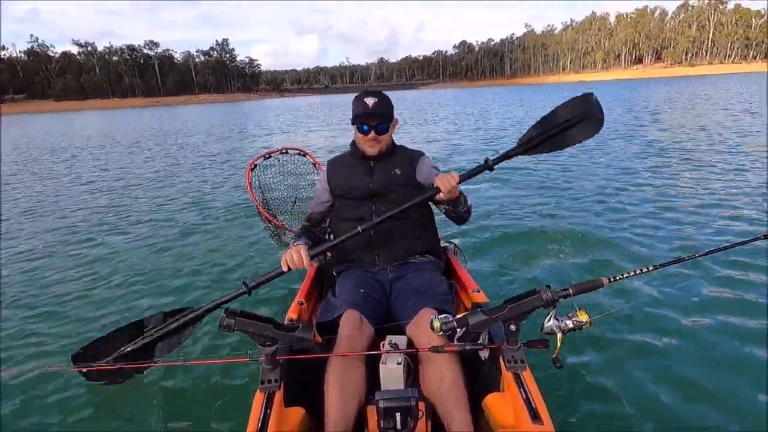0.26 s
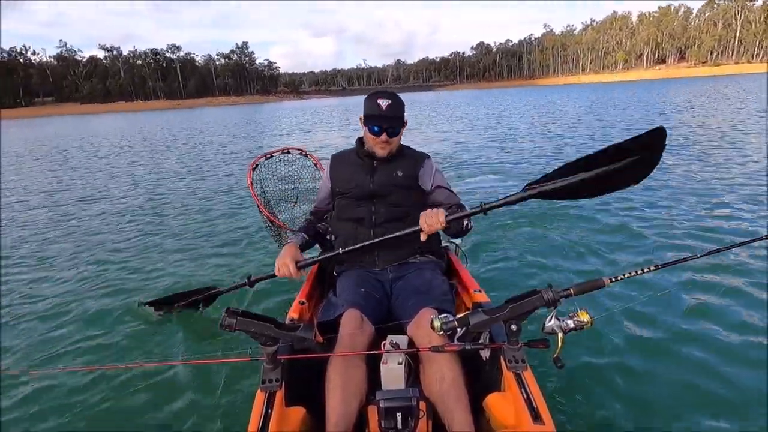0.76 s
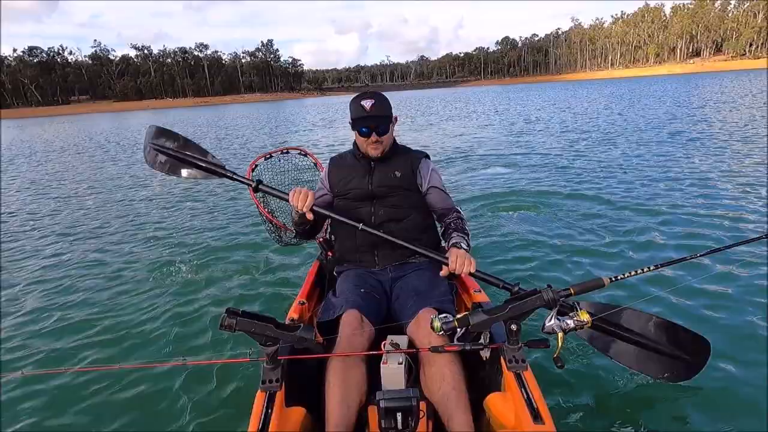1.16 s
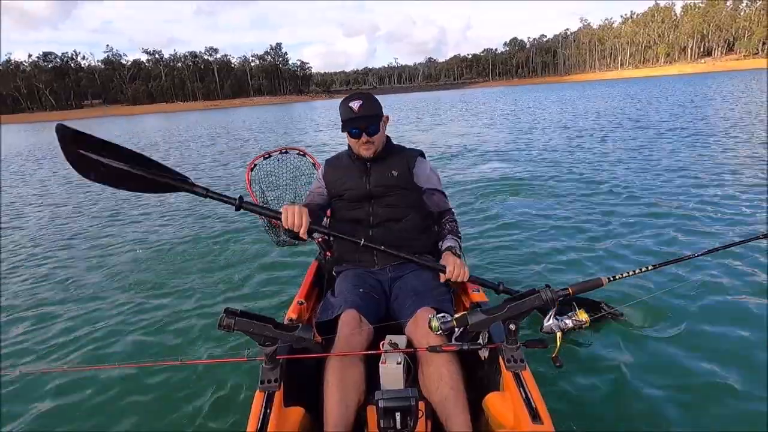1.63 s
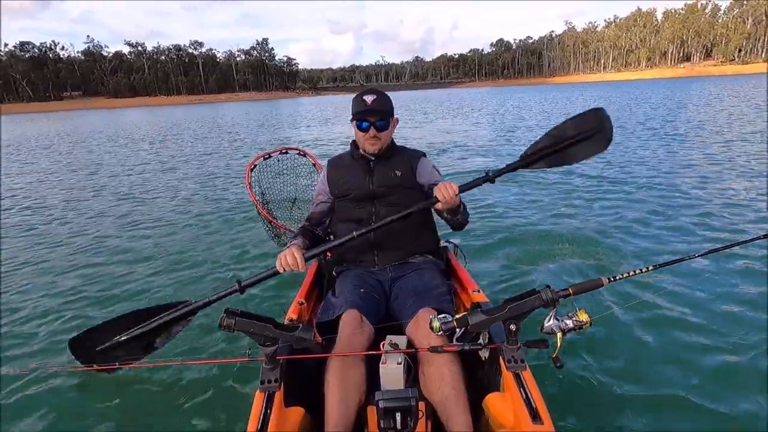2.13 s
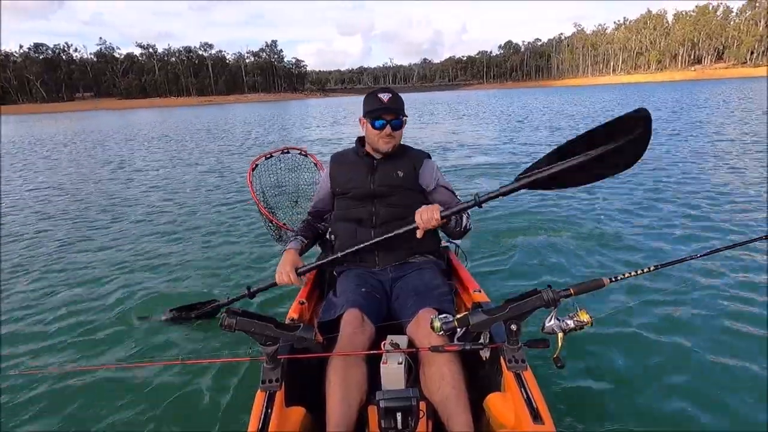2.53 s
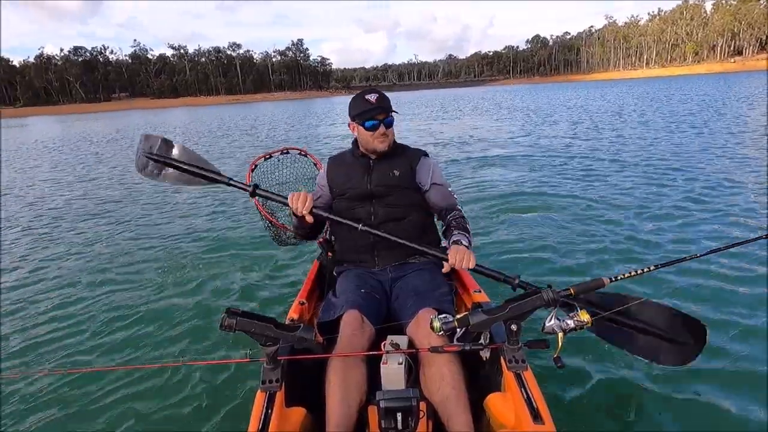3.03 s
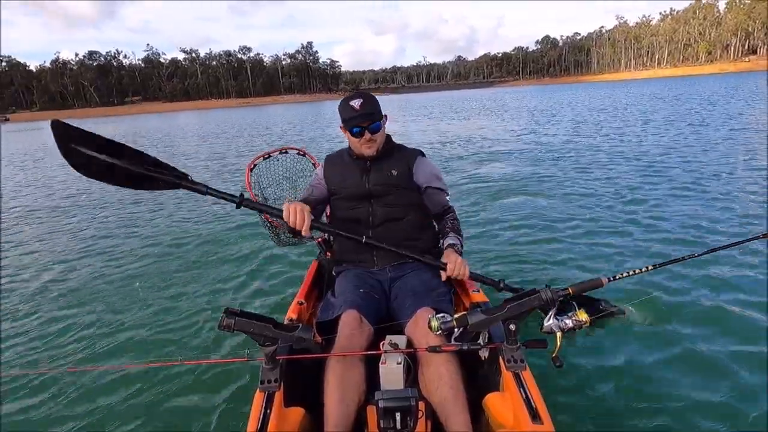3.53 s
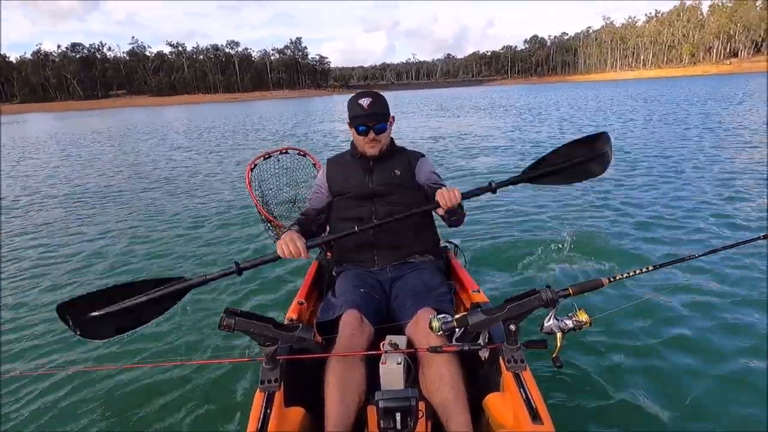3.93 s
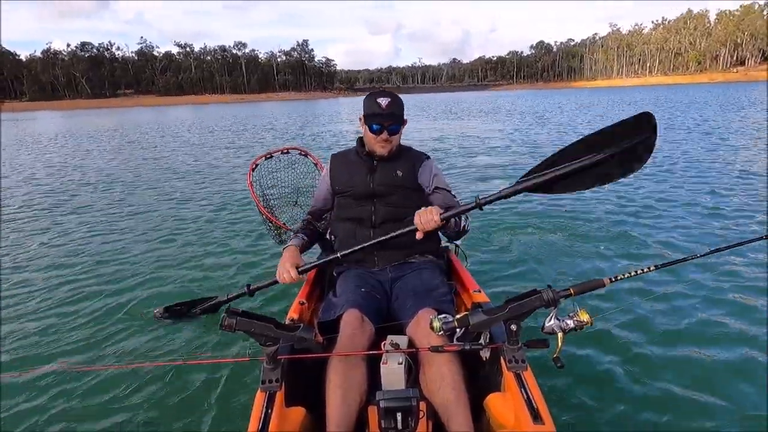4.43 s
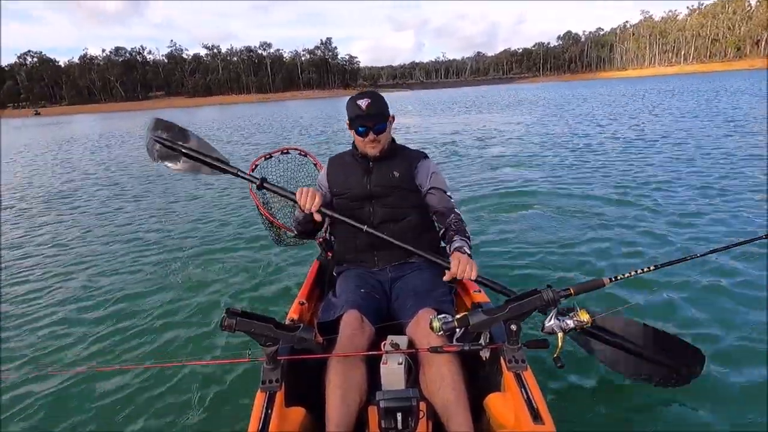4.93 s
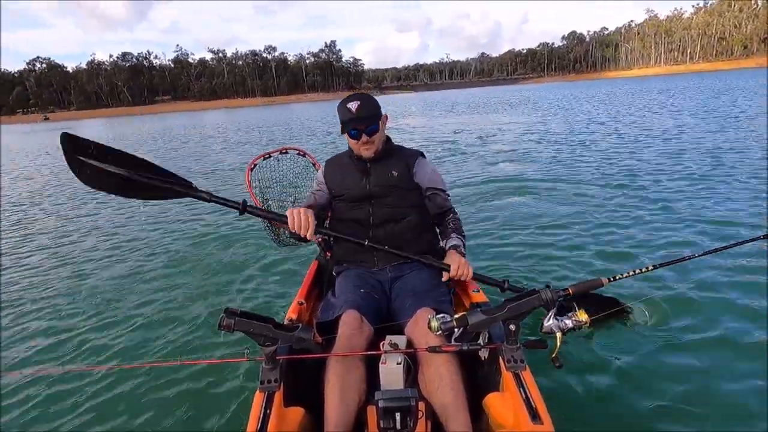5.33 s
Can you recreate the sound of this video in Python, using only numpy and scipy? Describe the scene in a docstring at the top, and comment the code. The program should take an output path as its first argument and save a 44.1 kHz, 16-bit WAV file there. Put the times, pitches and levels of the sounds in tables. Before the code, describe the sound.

Close on a small plastic boat outdoors, paddle blades dip one side then the other, giving gurgles, glugs, short splashes and crisp drops. Low gusty wind rumbles against the exposed microphone, heaviest during the first half. Later the wind thins, a fuller splash washes past near four seconds, and soft hollow hull taps join in. The sound is mono and dry, with no open-water reverberation.

```python
"""A paddle churns lake water beside a small plastic boat: band-shaped noise and swarms of tiny ringing
bubbles make fizz, slosh, glugs and spray that leap up as sheets of water break off the blade.
Single air pockets ring as gliding sines with a faint deck echo, and drops crack and ring on water or deck.
Noise pushes ring the hollow hull as wavelets slap it. Shaped noise makes the gusting wind's rumble,
buffeting and roar at the microphone, and a steady wash of ripples all around."""
import sys
import numpy as np
from scipy import signal
from scipy.io import wavfile
from scipy.ndimage import uniform_filter1d

SR = 44100
rng = np.random.default_rng(int(sys.argv[2]) if len(sys.argv) > 2 else 0)


def convert_level_to_amplitude(level_db):
    """Map a level in decibels to its linear amplitude factor."""
    exponent = np.asarray(level_db, float) / 20
    return 10 ** exponent


def master(y):
    """Save y as 16-bit WAV."""
    cut = np.clip(np.atleast_2d(y).T, -1, 1)
    pcm = np.round(cut * 32767)  # scale
    wavfile.write(sys.argv[1], SR, pcm.astype(np.int16))


N = 245635  # length [samples]


def evened(x):
    """Scales to rms 1."""
    return x / np.sqrt(np.mean(x ** 2) + 1e-20)


def read(points, hz):
    """Reads a spectrum table on a log-frequency axis."""
    f, value = np.transpose(points)
    return np.interp(np.log(hz + 1), np.log(f + 1), value)


def curves(rows):
    """The columns of a time table, one value a sample."""
    s, *columns = np.transpose(rows)
    t = np.arange(N) / SR
    return [np.interp(t, s, column) for column in columns]


def add(mix, s, sound):
    """Mixes a sound in at time s."""
    part = mix[round(s * SR):][:len(sound)]
    part += sound[:len(part)]


def flicker(s):
    """Smooth random curve of rms 1 that changes within about s seconds."""
    width = round(s * SR)
    smooth = uniform_filter1d(rng.standard_normal(N), width)
    return evened(uniform_filter1d(smooth, width))


def noise(spectrum, size, patchy_db, shared_db):
    """Random short-time spectra with drifting patches, under a level flicker shared by all bins."""
    frames = 4 * N // size + 5
    hz = np.fft.rfftfreq(size, 1 / SR)
    real, imaginary, patches = rng.standard_normal((frames, len(hz), 3)).T
    patches = uniform_filter1d(patches, size=5, axis=0)  # across frequency
    patches = evened(uniform_filter1d(patches, size=8, axis=1))  # across time
    bin_db = read(spectrum, hz)[:, None] + patchy_db * 2 * np.tanh(patches / 2)  # limits the extremes
    bins = (real + 1j * imaginary) * convert_level_to_amplitude(bin_db)
    sound = signal.istft(bins, nperseg=size, noverlap=3 * size // 4)[1][:N]
    return evened(convert_level_to_amplitude(shared_db) * sound)


def bubble(hz, t60, swell=0.00088, climb=0.5):
    """A ringing air pocket: a dying sine whose pitch glides by climb octaves, upward near the surface."""
    t = np.arange(0, max(t60, .003), 1 / SR)
    shape = convert_level_to_amplitude(-60 * t / t[-1]) * (1 - np.exp(-(t / swell) ** 2))
    pitch_hz = hz * 2 ** (climb * t / t[-1])
    return shape / shape.max() * np.sin(2 * np.pi * np.cumsum(pitch_hz) / SR)


def swarm(spectrum, low_hz, high_hz, per_s, cycles, spread_db, count=50):
    """Many small bubbles of mixed size bursting at random; a few are loud if spread_db is above zero."""
    loudness = convert_level_to_amplitude(spread_db * np.minimum(rng.exponential(1, N), 3.2))
    bursts = loudness * (rng.random(N) < per_s / SR)
    kind = rng.integers(0, count, N)
    out = np.zeros(N)
    for k, hz in enumerate(np.geomspace(low_hz, high_hz, count)):
        t60 = rng.uniform(0.16, 1.3) * cycles / hz
        grain = bubble(hz, t60, swell=2.2 / hz, climb=rng.uniform(-0.38, 0.52))
        out += convert_level_to_amplitude(read(spectrum, hz)) * hz * signal.oaconvolve(bursts * (kind == k), grain)[:N]
    return evened(out)


def lake_ripples():
    """Steady wash of ripples all around: patchy noise with a fixed spectrum."""
    # wash spectrum: (frequency [Hz], relative density [dB per Hz])
    ripple_spectrum = [(900, -47), (1600, -4.5), (3300, -21), (5500, -15), (7500, -15.5), (10000, -23.5),
                       (13500, -94)]
    return convert_level_to_amplitude(-70.5) * noise(ripple_spectrum, size=512, patchy_db=5, shared_db=0)


def wind():
    """Turbulence at the microphone port: smooth rumble, lumpier buffeting and a roar above it."""
    # gusts: (time [s], gust level [dB], upper-bass buffeting above the gust [dB])
    gusts = [(0, -28, -2), (.08, -35, -7), (.25, -22, -14.5), (.3, -27, -7.5), (.51, -20.5, -9),
             (1.66, -20, -4.5), (1.8, -19, -13.5), (2.22, -22.5, -12.5), (2.33, -19, -13.5),
             (2.48, -19.5, -5.5), (2.57, -22, -19), (2.6, -18.5, -5.5), (3.25, -23.5, -12.5),
             (3.43, -24.5, -20), (3.8, -24.5, -17), (3.89, -23, -16), (3.96, -34, -38), (4.08, -26, -21),
             (4.42, -35, -12), (4.55, -35, -12), (4.67, -28, -22), (4.75, -40, -5.5), (5.035, -26, -8.5),
             (5.065, -22.5, -13), (5.3, -26.5, -2.5), (5.57, -25, -20)]
    # spectra of the three layers: (frequency [Hz], relative density [dB per Hz])
    rumble_spectrum = [(15, 2), (40, 4), (100, 3), (160, -5), (260, -17), (500, -52.5), (1500, -110)]
    buffet_spectrum = [(100, -1), (190, 0.5), (300, -4), (450, -16.5), (900, -58), (2500, -110)]
    roar_spectrum = [(200, -1), (360, 3), (550, 1), (800, -5), (1500, -31), (5000, -92)]
    gust_db, above_db = curves(gusts)
    buffet_db = gust_db + above_db
    roar_db = -11 + 0.95 * buffet_db  # dB of roar per dB of buffeting
    lumps = flicker(0.0059)
    rumble = noise(rumble_spectrum, size=2048, patchy_db=0.0, shared_db=0.27 * flicker(0.31))
    buffet = noise(buffet_spectrum, size=1024, patchy_db=1.0, shared_db=3.1 * lumps)
    roar = noise(roar_spectrum, size=512, patchy_db=1.0, shared_db=5.3 * lumps)
    return convert_level_to_amplitude(gust_db) * rumble + convert_level_to_amplitude(buffet_db) * buffet + convert_level_to_amplitude(roar_db) * roar


def slap(push_s=0.0036):
    """A short uneven push of water rings the hull's modes."""
    # hull modes: (frequency [Hz], relative level [dB], time to die by 60 dB [s])
    hull_modes = [(379, -13, 0.15), (402, -7.5, 0.16), (506, 6.5, 0.058), (620, 4.5, 0.0046),
                  (900, 6, 0.0069)]
    t = np.arange(0, .2, 1 / SR)
    push = rng.standard_normal(len(t)) * np.exp(-t / push_s)
    ring = sum(convert_level_to_amplitude(db - 60 * t / t60) * np.sin(2 * np.pi * hz * t) for hz, db, t60 in hull_modes)
    sound = signal.fftconvolve(push, ring)[:len(t)]
    return sound / abs(sound).max()


def hull_slaps():
    """Wavelets slap the hull, each with a fresh random push."""
    # slaps: (time [s], peak level [dB])
    slap_times = [(3.107, -19), (3.46, -21.5), (4.091, -18), (4.455, -26.5), (5.195, -28), (5.278, -33)]
    out = np.zeros(N)
    for s, db in slap_times:
        add(out, s, convert_level_to_amplitude(db) * slap())
    return out


def drop(hz, crack_db, crack_s=0.0014):
    """A wide wet crack at impact while a tiny cavity rings."""
    t = np.arange(round(.03 * SR)) / SR
    burst = rng.standard_normal(len(t)) * np.exp(-t / crack_s) * np.minimum(t / 0.0008, 1)
    body_band = signal.butter(5, [550, 5250], "bandpass", fs=SR, output="sos")
    tick_band = signal.butter(5, [6200, 8970], "bandpass", fs=SR, output="sos")
    sound = signal.sosfilt(body_band, burst) + convert_level_to_amplitude(-18) * signal.sosfilt(tick_band, burst)
    sound *= convert_level_to_amplitude(crack_db) / abs(sound).max()
    t60 = min(25.4 / hz, t[-1])  # the cavity dies by 60 dB in 25.4 cycles
    add(sound, 0, bubble(hz, t60, swell=0.0007, climb=0.1))
    return sound


def blade_drops():
    """Drops off the blade strike water or deck, each with its own ring and crack."""
    # drops: (time [s], ring level [dB], ring pitch [Hz], crack above the ring [dB])
    drop_hits = [(0.1953, -29, 2670, -2), (0.441, -26.5, 2090, -14), (0.6567, -23, 4220, -16),
                 (0.681, -24, 2080, -14), (0.852, -42, 5600, -15.5), (1.455, -30, 2460, 4.5),
                 (1.6287, -21, 1930, -4.5), (1.8458, -23, 3100, -29), (1.872, -23.5, 2850, -22),
                 (1.938, -21.5, 4180, -34), (1.967, -18, 2100, -20), (2.1833, -18.5, 2930, -21),
                 (2.362, -25.5, 2470, 10.5), (2.451, -32, 2800, -15), (2.558, -32, 7100, -10),
                 (2.561, -23.5, 2740, 0), (2.631, -29.5, 3080, -2), (2.668, -36, 5550, -2),
                 (2.774, -29.5, 2830, 5), (2.827, -31.5, 2610, -3), (3.068, -30, 2840, -2),
                 (3.3, -29, 4700, 1.5), (3.5842, -18, 2910, -7.5), (3.847, -26, 3900, -21),
                 (3.886, -24.5, 3500, -17), (3.917, -27, 3280, -29), (3.932, -24.5, 3740, -7),
                 (4.091, -37, 2660, 8.5), (4.489, -35, 5350, -20), (4.708, -58, 2650, 22),
                 (5.0146, -37, 1980, 11.5), (5.3647, -30, 2650, 1)]
    out = np.zeros(N)
    for s, db, *character in drop_hits:
        add(out, s, convert_level_to_amplitude(db) * drop(*character))
    return out


def air_pockets():
    """Large bubbles and slower-swelling pockets ring one by one; the deck throws each back."""
    # large bubbles: (time [s], peak level [dB], pitch [Hz], time to die by 60 dB, at least 0.003 [s])
    large_bubbles = [(0.214, -23, 978, 0.055), (0.268, -29, 953, 0.038), (0.347, -29.5, 960, 0.11),
                     (0.451, -28.5, 1005, 0.073), (0.604, -29, 1135, 0.069), (0.751, -25, 1320, 0.012),
                     (0.89, -21.5, 1570, 0.0092), (0.948, -17, 1060, 0.032), (0.959, -19.5, 1242, 0.046),
                     (1.037, -27, 950, 0.058), (1.096, -26.5, 1390, 0.025), (1.165, -22, 754, 0.06),
                     (1.192, -27.5, 1470, 0.02), (1.23, -28, 935, 0.057), (1.247, -26, 1830, 0.033),
                     (1.414, -28, 1014, 0.034), (1.617, -17, 1090, 0.0046), (1.896, -25.5, 1380, 0.026),
                     (1.985, -24, 620, 0.066), (2.571, -20.5, 1140, 0.046), (2.64, -31.5, 1645, 0.045),
                     (2.833, -12, 830, 0.0023), (3.004, -24.5, 1240, 0.012), (3.074, -19.5, 970, 0.026),
                     (3.131, -22, 1050, 0.021), (3.214, -23, 750, 0.026), (3.264, -19.5, 855, 0.023),
                     (3.41, -37, 1360, 0.042), (3.586, -20, 1240, 0.015), (3.639, -17.5, 1380, 0.0074),
                     (3.949, -24, 1146, 0.033), (4.109, -24, 1060, 0.031), (4.504, -30, 1000, 0.046),
                     (4.712, -20, 1170, 0.015), (4.882, -22.5, 460, 0.028), (4.923, -21.5, 783, 0.022),
                     (5.237, -22.5, 1196, 0.0066), (5.279, -28, 1060, 0.024), (5.35, -24, 462, 0.087),
                     (5.544, -26.5, 1173, 0.06)]
    # gliding pockets: the same columns, then (swell time [s], pitch climb [octaves])
    risers = [(0.361, -34, 930, 0.054, 0.013, 1.44), (0.975, -19.5, 750, 0.07, 0.0012, 2.8),
              (1.0, -28, 900, 0.073, 0.0033, 2), (2.315, -20.5, 150.2, 0.12, 0.019, 5),
              (3.468, -26, 467, 0.099, 0.0081, -1.3), (3.585, -28.5, 753, 0.16, 0.012, 4.65),
              (3.639, -28, 900, 0.064, 0.0033, 3), (4.684, -37, 1180, 0.022, 0.019, 0),
              (4.748, -23, 1103, 0.014, 0.009, -0.1), (4.753, -21, 605, 0.025, 0.007, 0.9),
              (4.845, -31.5, 900, 0.1, 0.025, -1.3), (5.455, -34, 671, 0.077, 0.013, 1.3),
              (5.051, -28, 288.4, 0.23, 0.0056, 1.9), (5.095, -25.5, 280, 0.052, 0.0097, -0.6),
              (5.062, -20, 189, 0.12, 0.0048, 0.5), (5.148, -22, 235, 0.094, 0.011, 0.5)]
    # deck echo: (delay [s], level [dB])
    deck_echoes = [(.0057, -18)]
    bubbles = np.zeros(N)
    for s, db, *shape in (*large_bubbles, *risers):
        add(bubbles, s, convert_level_to_amplitude(db) * bubble(*shape))
    out = bubbles.copy()
    for delay, db in deck_echoes:
        add(out, delay, convert_level_to_amplitude(db) * bubbles)
    return out


def churn():
    """Water torn by the blade: low slosh and glugs, fizz and small bubbles, with finer flickering spray."""
    # churn: (time [s], level [dB])
    churn_levels = [(0, -46.5), (.1, -43), (.6, -48), (1.2, -46), (1.45, -48.5), (1.53, -53.5),
                    (1.75, -49.5), (2.0, -44), (2.5, -49), (2.73, -53.5), (2.87, -41.5), (3.03, -51),
                    (3.28, -37.5), (3.35, -57.5), (3.55, -51), (3.82, -47.5), (4.05, -51), (4.45, -49),
                    (4.68, -56), (4.75, -50.5), (5.05, -47.5), (5.3, -55), (5.57, -47.5)]
    # sheets of water breaking off the blade: (time of peak [s], rise of the churn [dB], length [s],
    # rise of the spray [dB], rise of the slosh [dB])
    splashes = [(0.109, 4, 0.062, 8.5, -8), (0.975, 5.5, 0.059, 10.5, -13), (1.261, 9.5, 0.043, 7.5, 8),
                (1.404, 12.5, 0.043, 7.5, -21), (1.655, 3.5, 0.1, 2, 22), (1.879, 10.5, 0.046, -6, 17.5),
                (1.974, 8.5, 0.077, 0, 7), (2.18, 18.5, 0.023, 4, 5), (2.412, 7, 0.12, 9.5, 16.5),
                (2.569, 9.5, 0.062, 5, 3), (3.072, 11, 0.026, 9, -6), (3.122, 7.5, 0.055, 6, 12),
                (3.741, 10.5, 0.046, 3, -10), (3.881, 13, 0.27, 8.5, 11), (4.103, -8, 0.033, 8, 21.5),
                (4.139, 15.5, 0.11, 10.5, 5), (4.33, 8.5, 0.13, 5.5, 7.5), (4.509, 6, 0.03, 9.5, 15),
                (4.753, 9, 0.079, 12, 13.5), (5.355, 11, 0.035, 14, 22.5), (5.56, 15.5, 0.034, 8, 17)]
    # spectra of fizz and glugs, slosh, and spray: (frequency [Hz], relative density [dB per Hz])
    churn_spectrum = [(350, -43.5), (700, -21.5), (1100, 0.5), (1600, -6.5), (2800, -11), (4200, -15.5),
                      (5500, -28.5), (8000, -61)]
    slosh_spectrum = [(200, -8), (400, -2.5), (600, -7.5), (900, -10.5), (1500, -16), (5000, -101.5)]
    spray_spectrum = [(3000, -6), (5300, 4), (7000, 2), (8600, -1), (10000, -9.5), (12400, -12.5),
                      (15000, -58)]
    churn_db, = curves(churn_levels)
    t = np.arange(N) / SR
    coarse_t = t[::32]
    s, *rises_db, = np.transpose(splashes)
    sheet_rise, length, spray_rise, slosh_rise = rises_db
    swell = np.exp(-(2 * (coarse_t[:, None] - s) / length) ** 2)
    splash_db = np.interp(t, coarse_t, swell @ sheet_rise)
    mist_db = np.interp(t, coarse_t, swell @ spray_rise)
    low_db = np.interp(t, coarse_t, swell @ slosh_rise)

    bursts = flicker(0.017)
    body_flicker = 5.3 * bursts * convert_level_to_amplitude(-0.6 * splash_db)  # a thick sheet of water flickers less
    body = 0.93 * noise(churn_spectrum, size=256, patchy_db=8.0, shared_db=body_flicker)
    body += 0.57 * swarm(churn_spectrum, 1553, 5510, per_s=1500, cycles=49.6, spread_db=6.0)
    slosh = noise(slosh_spectrum, size=512, patchy_db=3.0, shared_db=3.2 * flicker(0.024))
    slosh += 0.87 * swarm(slosh_spectrum, 230.4, 904, per_s=90, cycles=33.7, spread_db=3.5)
    glugs = swarm(churn_spectrum, 480, 1915, per_s=360, cycles=37, spread_db=0.0)
    spray = 0.26 * noise(spray_spectrum, size=256, patchy_db=3.5, shared_db=3.4 * bursts)
    spray += 0.15 * swarm(spray_spectrum, 4530, 10040, per_s=150, cycles=34, spread_db=4.5)

    out = convert_level_to_amplitude(churn_db + splash_db) * body
    out += convert_level_to_amplitude(1.5 + churn_db + low_db) * slosh
    out += convert_level_to_amplitude(churn_db + 0.4 * splash_db - 4) * glugs
    out += convert_level_to_amplitude(-18.5 + 0.71 * churn_db + mist_db) * spray  # 0.71 dB of spray per dB of churn
    return out


def scene():
    """Ripples and wind under the slaps, drops, air pockets and churned water, in one channel."""
    mix = lake_ripples() + wind() + hull_slaps() + blade_drops() + air_pockets() + churn()
    return mix[None]


def band_limit(x):
    """A steep low-pass at the top of the band."""
    return signal.sosfilt(signal.butter(12, 15270, fs=SR, output="sos"), x)


def record(dry):
    """Delivers the finished mix."""
    return band_limit(dry)


dry = scene()
out = record(dry)
master(out)
```